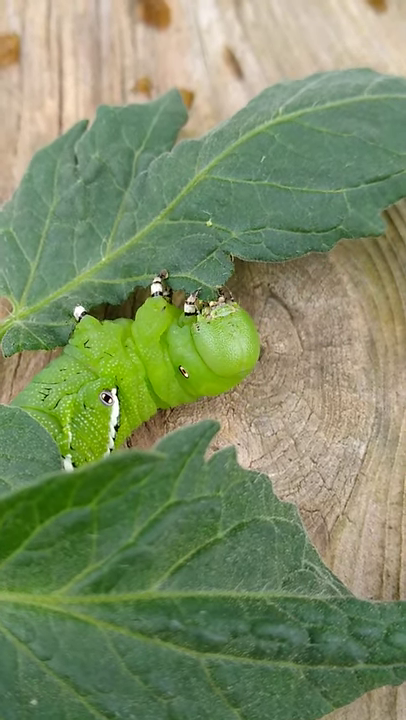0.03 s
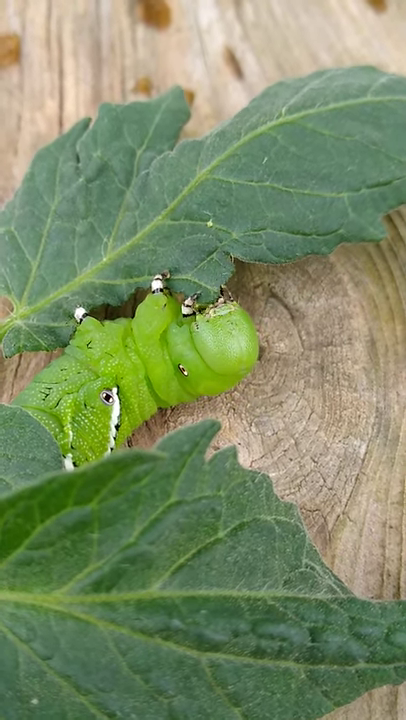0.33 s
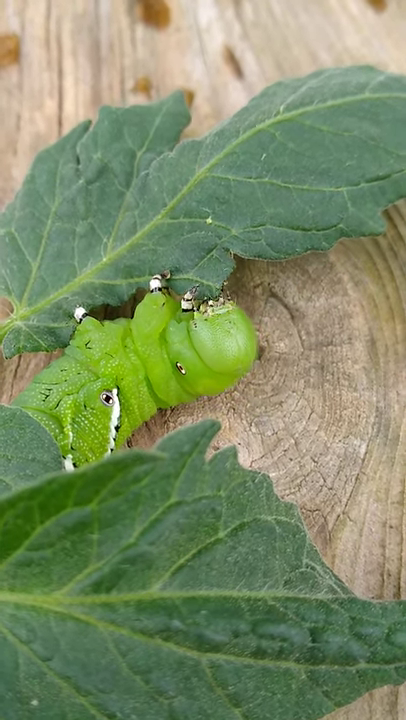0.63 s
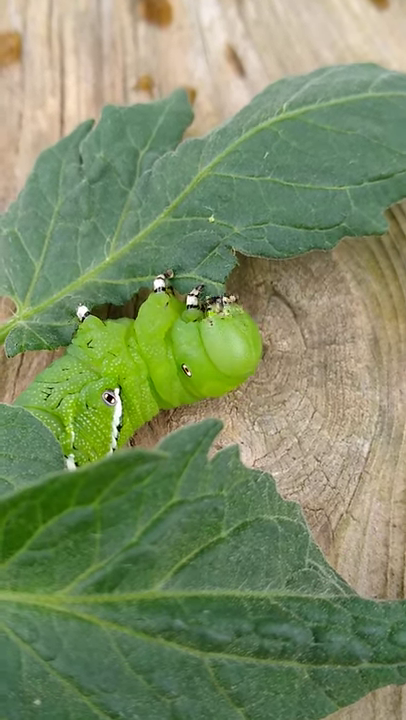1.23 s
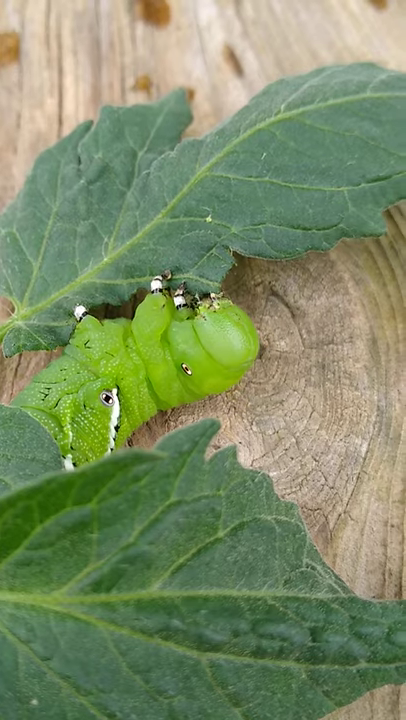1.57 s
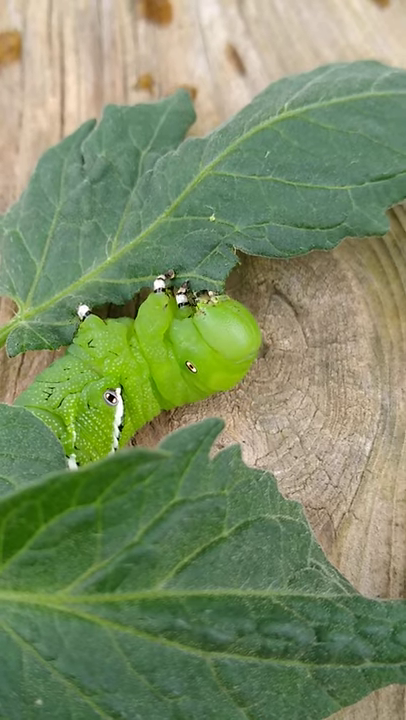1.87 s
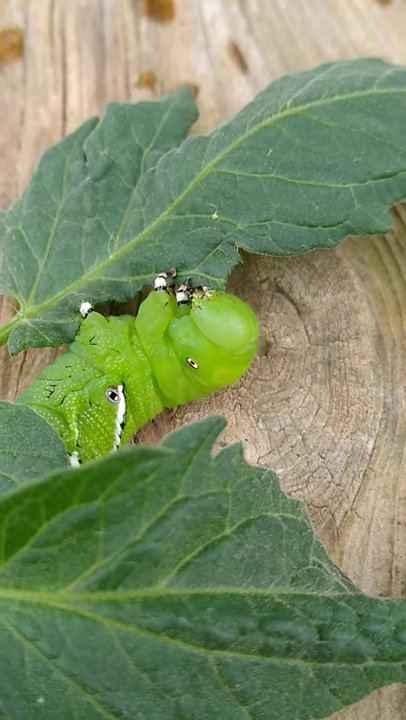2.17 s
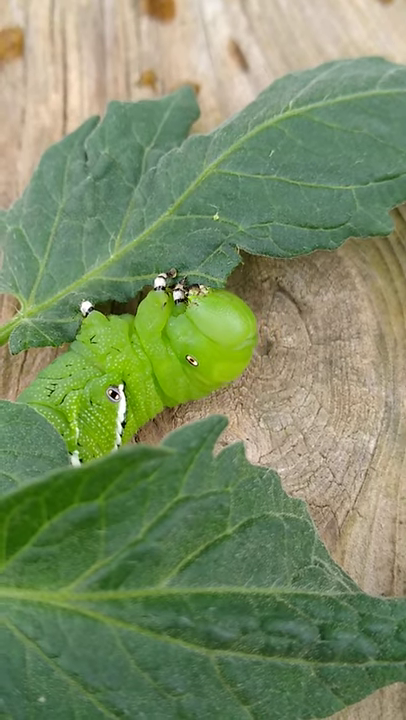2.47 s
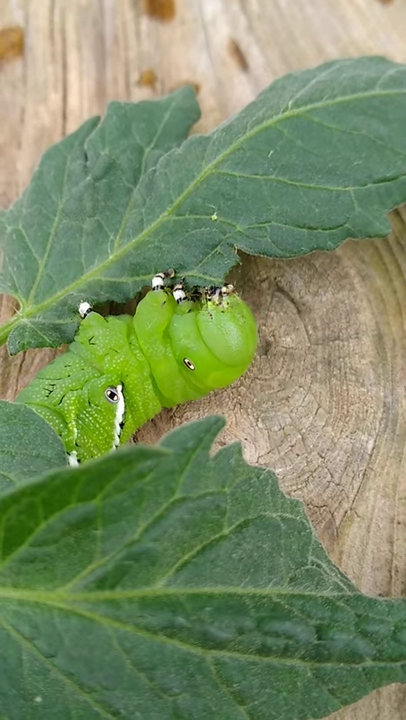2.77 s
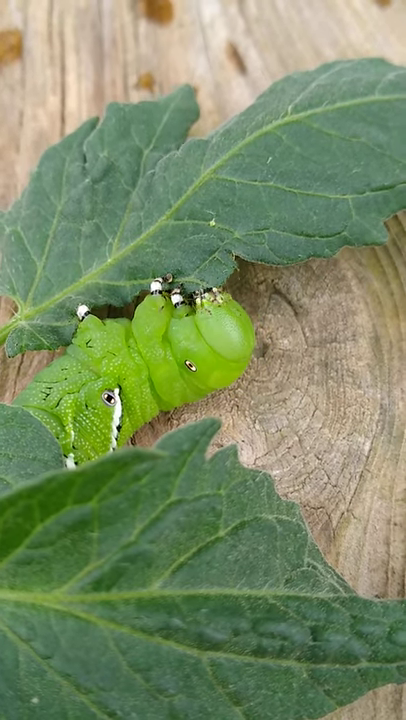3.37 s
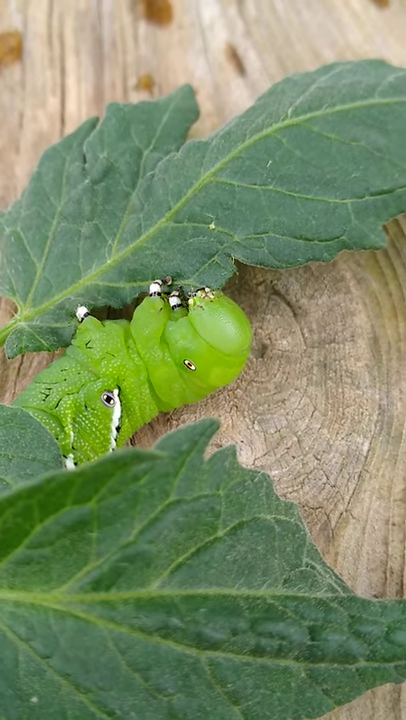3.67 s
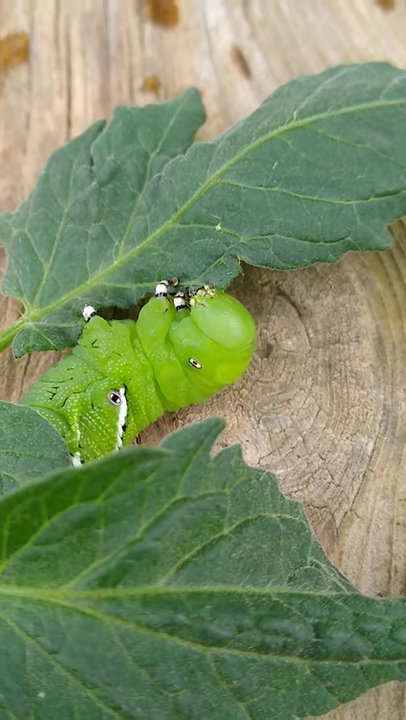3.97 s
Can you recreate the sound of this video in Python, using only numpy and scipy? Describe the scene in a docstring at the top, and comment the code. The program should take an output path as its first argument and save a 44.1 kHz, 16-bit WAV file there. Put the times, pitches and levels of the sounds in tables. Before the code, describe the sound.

Distant engines, probably mowers, hum over faint traffic while a small bird peeps nearby.

```python
"""A garden, with two engines running far off, probably mowers. Their hums beat slowly against each
other over a wash of distant traffic. Each hum is a stack of tones at multiples of the firing rate.
A small bird nearby repeats a soft two-note peep and another gives three thin rising calls, all pure
tones that slide in pitch. A faint high chirp, probably an insect, pulses steadily. Walls and plants
add a short echo to these small voices, while far birds twitter, blurred by distance."""
import sys
import numpy as np
from scipy import signal
from scipy.fft import rfft, irfft
from scipy.io import wavfile
from scipy.ndimage import uniform_filter1d

SR = 44100
rng = np.random.default_rng(int(sys.argv[2]) if len(sys.argv) > 2 else 0)


def bounce(signal):
    """Save signal as a 16-bit WAV file at the path given by the first command-line argument."""
    frames = np.transpose(np.atleast_2d(signal))
    limited = np.clip(frames, -1, 1)
    pcm = np.round(limited * 32767).astype(np.int16)
    wavfile.write(sys.argv[1], SR, pcm)


N = 176400

# how often the deep engine fires: t/s, f/Hz
DEEP_FIRING_RATE = [(0.0, 25.9), (0.05, 25.39), (0.67, 25.1), (2.51, 25.25), (2.82, 25.28), (3.4, 25.29),
                    (4.0, 25.4)]
# the tones of the deep engine: multiple of the firing rate, level/dB
DEEP_TONES = [(2, -52), (3, -63), (4, -46), (5, -44), (6, -47), (7, -47), (8, -53.5), (10, -62.5),
              (11, -60.5), (13, -69.5), (14, -72.5), (15, -73.5), (16, -74.5), (20, -65.5)]
# it grows brighter as it moves: t/s, gain of the lowest two tones/dB, gain of the rest/dB
DEEP_GAINS = [(0, -1, -4), (.7, 3.5, 1.5), (1.4, 0, -3), (2.1, -1, 2), (2.7, -1, 2.5), (3.3, -0.5, -.5),
              (4, 2, 1.5)]
# how often the high engine fires: t/s, f/Hz
HIGH_FIRING_RATE = [(0, 97.6), (.7, 97.3), (1.2, 97.7), (2.5, 97.6), (2.8, 98.6), (3.05, 98.7),
                    (3.35, 97.7), (3.7, 97.7), (4, 98.4)]
# its strong tones swell and fade: t/s, level/dB for each of tones 1, 2 and 3
HIGH_STRONG_LEVELS = [(0, -34, -33, -56.5), (.45, -38, -38.5, -49), (.72, -37.5, -42, -54.5),
                      (1.1, -38.5, -46.5, -46), (1.3, -40.5, -43.5, -64), (1.65, -43, -40.5, -49.5),
                      (2, -41, -37, -47), (2.35, -43.5, -36, -42), (2.7, -41.5, -46.5, -50),
                      (3.05, -44, -37.5, -50.5), (3.3, -41, -38.5, -59), (3.55, -43.5, -42, -49),
                      (3.8, -46.5, -40, -43.5), (4, -56, -43, -45)]
# its weak tones rise and fall: t/s, level/dB for each of tones 4, 5 and 6, gain of the top tones/dB
HIGH_WEAK_LEVELS = [(0, -58, -60.5, -57, 2), (.45, -66.5, -59, -65, 2), (1.1, -62.5, -65.5, -68, -1.5),
                    (1.6, -64, -57, -67, 1), (2.5, -63, -59, -67, 1), (2.9, -62.5, -61, -69, 0.5),
                    (3.3, -59, -67.5, -69, 3.5), (3.75, -62, -62.5, -70, 3), (4, -46, -63, -67, 3.5)]
# its top tones: multiple of the firing rate, level/dB
HIGH_TOP_TONES = [(7, -67), (8, -67.5), (9, -69.5), (10, -72.5), (11, -68), (12, -69.5), (13, -69),
                  (14, -68), (15, -73.5), (16, -74), (17, -69.5), (19, -68.5), (21, -71)]
# the near bird's notes: loudest moment t/s, peak level/dB, top pitch f/Hz, length/s
PEEP_NOTES = [(0.209, -48, 3930, 0.037), (.259, -42.5, 4020, 0.032), (.555, -54, 3800, .012),
              (.604, -46, 3960, .031), (.658, -39.5, 4040, 0.029), (0.958, -48.5, 3900, 0.028),
              (1.003, -46.5, 3940, 0.015), (1.308, -50, 3890, .022), (1.360, -41.5, 4040, 0.033),
              (1.685, -49, 3850, .019), (1.740, -40, 4030, 0.026), (2.081, -50.5, 3880, .02),
              (2.134, -42.5, 4000, 0.031), (2.627, -49.5, 3880, 0.021), (2.676, -42.5, 4030, 0.032),
              (3.026, -47.5, 3930, .028), (3.075, -39.5, 4030, 0.027), (3.549, -49.5, 3840, 0.022),
              (3.59, -46.5, 3950, 0.012)]
# the second bird's calls: start t/s, length/s, level/dB, starting pitch f/Hz
RISING_CALLS = [(0.814, 0.024, -54.5, 5480), (3.594, 0.027, -51.5, 5140), (3.784, 0.012, -54, 6900)]
# the pulses of the high chirp: middle t/s, top pitch f/Hz, level/dB
CHIRP_PULSES = [(0.156, 7000, -69), (0.331, 7210, -68.5), (.511, 7230, -70), (.698, 7200, -68),
                (.878, 7230, -67), (1.06, 7230, -67), (1.234, 7260, -68), (1.406, 7100, -69),
                (1.58, 7140, -66), (1.757, 7220, -66.5), (1.952, 7040, -67), (2.124, 7120, -67),
                (2.3, 7100, -65.5), (2.48, 7210, -67), (2.66, 7130, -67), (2.838, 7220, -72),
                (3.016, 7230, -68.5), (3.191, 7100, -65), (3.374, 7200, -67), (3.553, 7130, -66.5),
                (3.732, 7230, -65), (3.913, 7220, -77)]
# the far birds' notes: middle t/s, f/Hz, level/dB
FAR_NOTES = [(.08, 4530, -64), (.35, 4780, -68), (.44, 3380, -65), (0.621, 4550, -63), (.9, 4680, -74),
             (1.3, 4680, -66.5), (1.418, 4530, -63.5), (1.82, 4500, -63), (1.918, 4550, -66),
             (2.239, 4600, -66), (2.32, 4640, -62), (2.74, 4930, -64), (2.81, 3340, -61),
             (2.899, 4540, -64), (3.26, 4660, -68), (3.51, 4750, -62)]
# the tone colour of traffic and leaves: f/Hz, relative level/dB
WASH_SPECTRUM = [(20, -23.5), (36, -21), (55, -5.5), (90, 1.5), (170, 3), (265, 4), (340, -5.5),
                 (440, -6.5), (880, -11.5), (1150, -6.5), (1450, -3.5), (1900, -7.5), (2400, -14.5),
                 (3200, -19), (4700, -18), (5200, -23), (6600, -24.5), (7400, -31), (7900, -41),
                 (8400, -45.5)]
# small changes in the treble of that wash: t/s, gain/dB
WASH_TREBLE_GAIN = [(0, 0), (.8, -.4), (1.5, 0.7), (2.7, -0.5), (3.3, 0.1), (4, -1)]


def deep_engine(firings):
    """A slow throbbing exhaust: its tones swing nearly in step, one soft puff per firing."""
    low_db, rest_db = curve(DEEP_GAINS, 1), curve(DEEP_GAINS, 2)
    smear = 0.089 * rng.standard_normal(len(DEEP_TONES))  # reflections pull the tones out of step
    out = np.zeros(N)
    for i, (multiple, db) in enumerate(DEEP_TONES):
        gain_db = low_db if i < 2 else rest_db
        out += engine_tone(multiple * firings + smear[i], db + gain_db, waver_db=1.22)
    return out


def high_engine():
    """A faster engine: three strong tones and a row of faint, unsteady overtones."""
    firings = cycles(curve(HIGH_FIRING_RATE))
    out = np.zeros(N)
    for k in (1, 2, 3):
        out += engine_tone(k * firings + rng.random(), curve(HIGH_STRONG_LEVELS, k), waver_db=1.2)
    for k in (4, 5, 6):
        out += engine_tone(k * firings + rng.random(), curve(HIGH_WEAK_LEVELS, k - 3), waver_db=2)
    brightness_db = curve(HIGH_WEAK_LEVELS, 4)
    for k, db in HIGH_TOP_TONES:
        out += engine_tone(k * firings + rng.random(), db + brightness_db, waver_db=2)
    return out


def engine_tone(turns, db, waver_db):
    """One engine tone, whose loudness and timing waver on the way through the air."""
    phase = 2 * np.pi * turns + 0.065 * waver_db * drift(hz=5)
    loudness = amp(db + waver_db * drift(hz=5))
    return np.sqrt(2) * loudness * np.sin(phase)


def peeping_bird():
    """Pure notes that swell, arch over in pitch and stop quickly on the way down."""
    loudest_at, highest_at = 0.66, 0.58  # shares of a note's length
    out = np.zeros(N)
    for start, db, top_hz, length in PEEP_NOTES:
        start -= loudest_at * length  # the table gives the loudest moment
        t = np.arange(0, length, 1 / SR)
        progress = t / length
        arch = ((t - highest_at * length) / 0.0095) ** 2
        bend_hz = 170 * amp(0.57 * (db + 43.5))  # softer peeps arch less
        lean = 1 + 0.42 * (2 * progress - 1)  # the fall is steeper than the rise
        hz = top_hz - bend_hz * arch * lean
        fade_in = np.sin(np.pi / 2 * progress / loudest_at) ** 2
        fade_out = np.sqrt(abs(np.cos(np.pi / 2 * (progress - loudest_at) / (1 - loudest_at))))
        swell = np.where(progress < loudest_at, fade_in, fade_out)
        add(out, start, amp(db) * swell * whistle(hz))
    return garden_echo(out, echo_db=-21.5)


def calling_bird():
    """Thin whistles that shoot upward and level off."""
    target_hz, glide_s, fade_in_s, fade_out_s = 8260, 0.0064, 0.002, 0.0071
    out = np.zeros(N)
    for start, length, db, start_hz in RISING_CALLS:
        t = np.arange(0, length, 1 / SR)
        hz = target_hz + (start_hz - target_hz) / (1 + t / glide_s)
        swell = np.minimum(t / fade_in_s, 1) * np.minimum((length - t) / fade_out_s, 1)
        add(out, start, amp(db) * swell * whistle(hz))
    return garden_echo(out, echo_db=-4.5)


def pulsing_chirp():
    """Probably an insect: faint, slightly rough chirps that arch in pitch, at an almost even pace."""
    length_s, arch_hz = 0.067, 716
    t = np.arange(0, length_s, 1 / SR)
    position = 2 * t / length_s - 1  # -1 at the start of a pulse, +1 at its end
    swell = np.cos(np.pi / 2 * position)
    jitter_hz = 58.5 * drift(hz=300)
    out = np.zeros(N)
    for middle, top_hz, db in CHIRP_PULSES:
        rough_hz = np.roll(jitter_hz, -round(middle * SR))[:len(t)]
        hz = top_hz - arch_hz * position ** 2 + rough_hz
        add(out, middle - length_s / 2, amp(db) * swell * whistle(hz))
    return garden_echo(out, echo_db=-4)


def far_birds():
    """Bird notes that distance smears into soft puffs of noise, each around one pitch."""
    spread_s, spread_hz = 0.022, 140
    t = np.arange(-SR // 8, SR // 8) / SR
    f = np.fft.rfftfreq(len(t), 1 / SR)
    swell = np.exp(-0.5 * (t / spread_s) ** 2)
    out = np.zeros(N)
    for middle, hz, db in FAR_NOTES:
        band = np.exp(-0.5 * ((f - hz) / spread_hz) ** 2)
        blur = unit(irfft(rfft(rng.standard_normal(len(t))) * band, len(t)))
        note = amp(db) * blur * swell
        add(out, middle + t[0], note[middle + t >= 0])
    return out


def traffic_wash(firings):
    """Distant traffic, machines and leaves: noise that throbs slightly with the deep engine."""
    noise = patchy_noise(WASH_SPECTRUM, patch_db=1.25)
    treble = signal.sosfiltfilt(signal.butter(2, 2000, "high", fs=SR, output="sos"), noise)
    noise += (amp(curve(WASH_TREBLE_GAIN)) - 1) * treble
    level_db = -46 + 0.55 * drift(hz=2)
    throb = 1 + 0.056 * np.cos(2 * np.pi * firings)
    return noise * amp(level_db) * throb


def patchy_noise(spectrum, patch_db, size=2048):
    """Noise with a given tone colour and drifting louder and softer patches."""
    hz = np.fft.rfftfreq(size, 1 / SR)
    table_hz, table_db = np.transpose(spectrum)
    colour = amp(np.interp(np.log(hz + 1), np.log(table_hz), table_db))
    hop = size // 4
    real, imaginary, patches = rng.standard_normal((3, N // hop + 5, len(hz)))
    patches = uniform_filter1d(patches, 9, axis=0)  # smooth over time
    patches = unit(uniform_filter1d(patches, 9, axis=1))  # and over pitch
    slices = (real + 1j * imaginary) * colour * amp(patch_db * patches)
    _, noise = signal.istft(slices.T, nperseg=size, noverlap=size - hop)
    return unit(noise[:N])


def garden_echo(sound, echo_db):
    """Adds a short scatter of echoes from walls and plants."""
    delay_s, die_away_s = 0.006, 0.23
    t = np.arange(SR // 2) / SR
    tail = rng.standard_normal(len(t)) * amp(-60 * t / die_away_s) * (t > delay_s)
    return sound + amp(echo_db) * signal.fftconvolve(sound, tail / np.linalg.norm(tail))[:N]


def drift(hz, size=8192):
    """Smooth random wandering, up to about the given rate."""
    f = np.arange(size // 2 + 1) * SR / N
    keep_slow = (f > 0) / (1 + (f / hz) ** 2)
    slow = irfft(rfft(rng.standard_normal(size)) * keep_slow, size)
    return unit(np.interp(np.linspace(0, size - 1, N), np.arange(size), slow))


def whistle(hz):
    """A pure tone that follows a changing pitch."""
    return np.sin(2 * np.pi * cycles(hz))


def cycles(hz):
    """Counts the cycles gone by at a changing rate."""
    return np.cumsum(hz) / SR


def amp(db):
    """Turns decibels into a gain."""
    return 10 ** (np.asarray(db) / 20)


def unit(x):
    """Scales a signal to an average strength (rms) of one."""
    return x / np.sqrt(np.mean(x ** 2) + 1e-20)


def curve(rows, column=1):
    """Joins the points in one column of a time table with straight lines."""
    rows = np.array(rows)
    return np.interp(np.arange(N) / SR, rows[:, 0], rows[:, column])


def add(mix, start, sound):
    """Mixes a sound in at a start time in seconds."""
    part = mix[max(round(start * SR), 0):][:len(sound)]
    part += sound[:len(part)]


def scene():
    """Engines and traffic far off, small voices of the garden close by, in one channel."""
    firings = cycles(curve(DEEP_FIRING_RATE))
    far = deep_engine(firings) + high_engine() + traffic_wash(firings) + far_birds()
    near = peeping_bird() + calling_bird() + pulsing_chirp()
    return (far + near)[None]


def record(dry):
    """Cuts away the highest treble."""
    cutoff_hz = 8300
    low_pass = signal.firwin(361, cutoff_hz, window=("kaiser", 8), fs=SR)
    return signal.oaconvolve(dry, low_pass[None], "same")


dry = scene()
out = record(dry)
bounce(out)
```